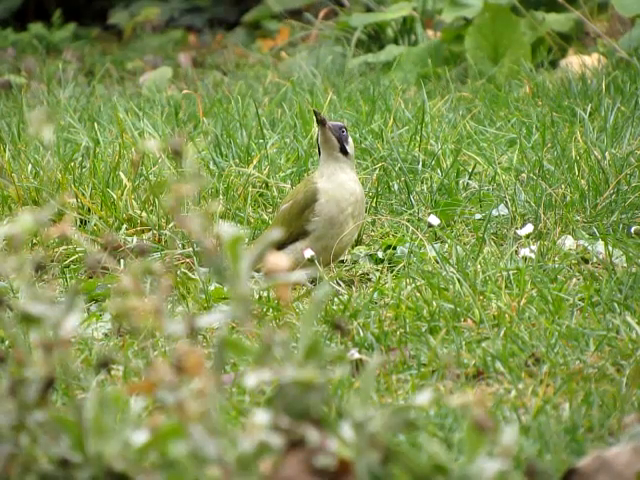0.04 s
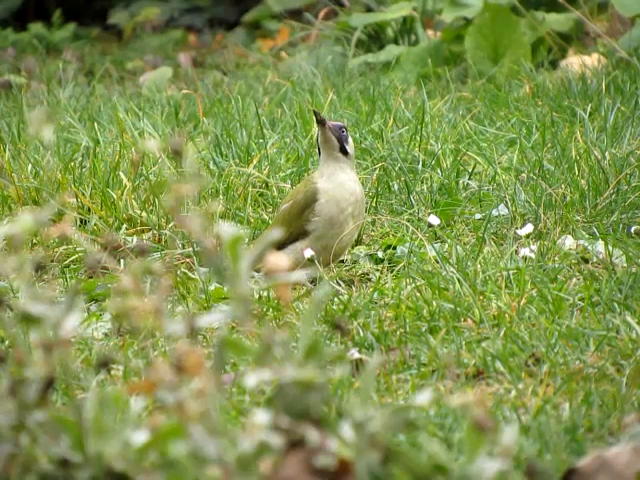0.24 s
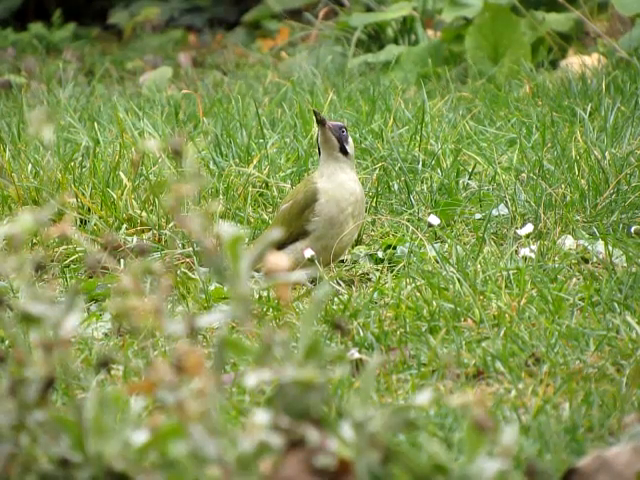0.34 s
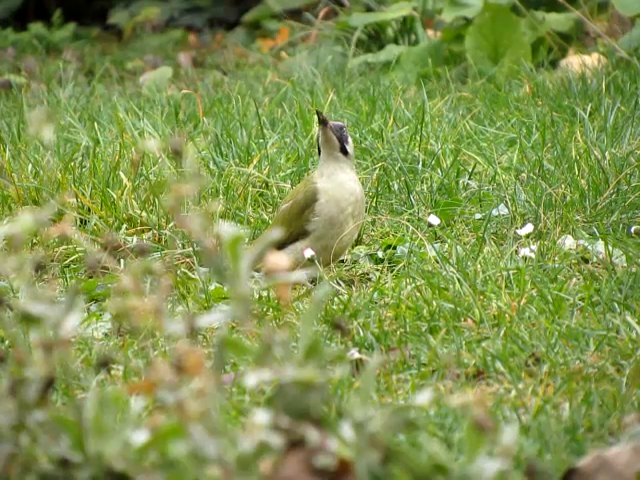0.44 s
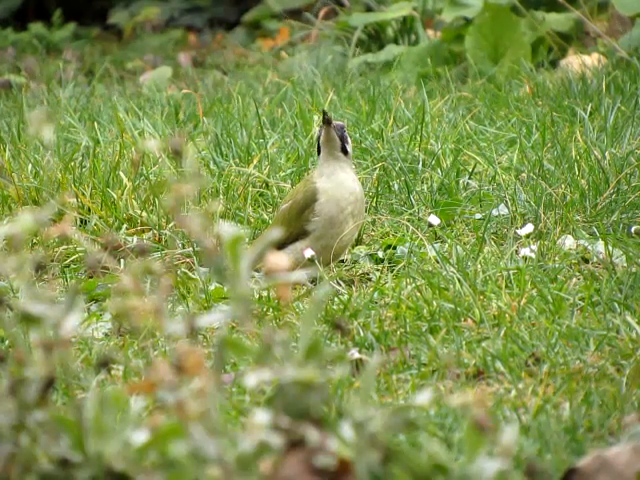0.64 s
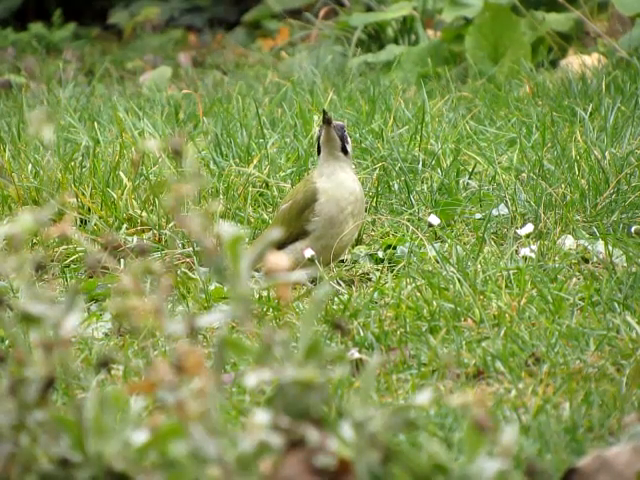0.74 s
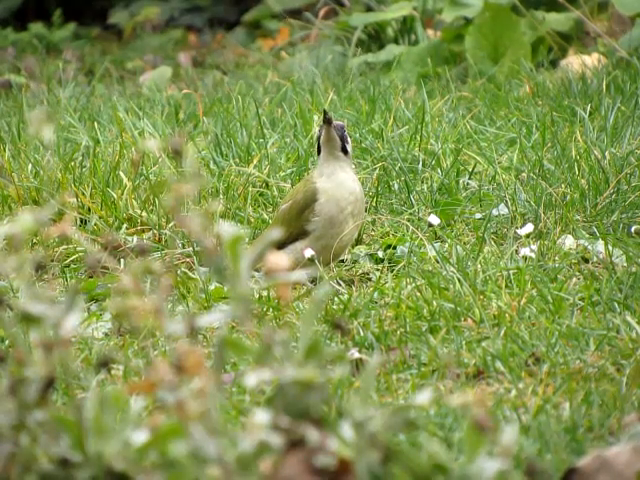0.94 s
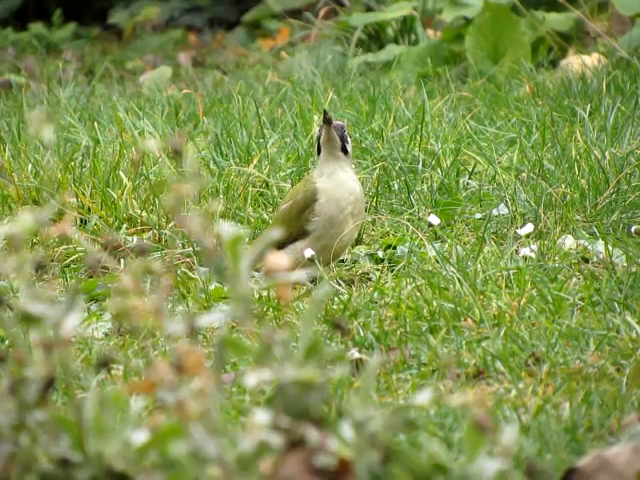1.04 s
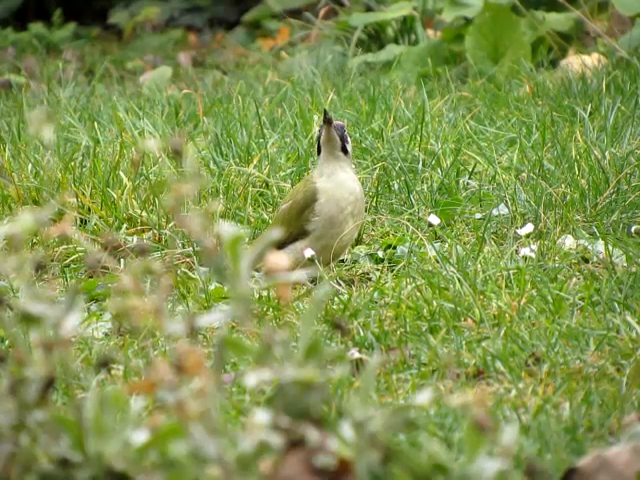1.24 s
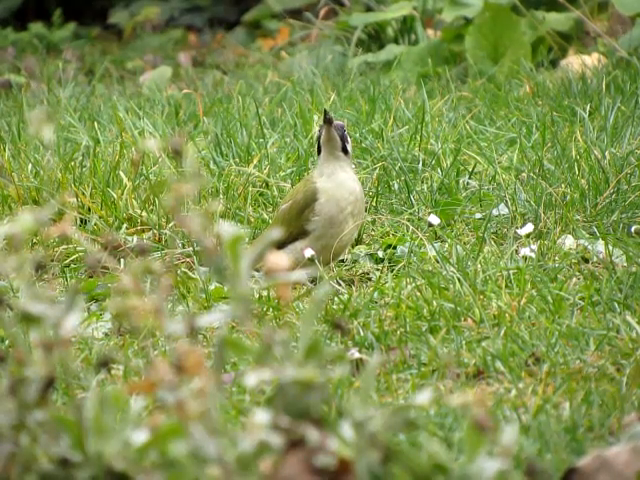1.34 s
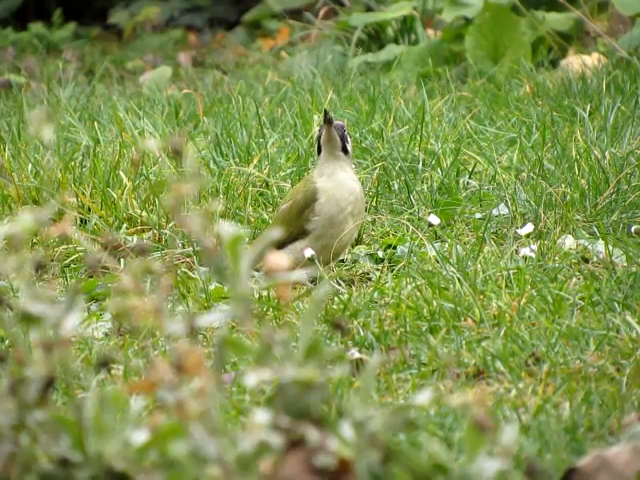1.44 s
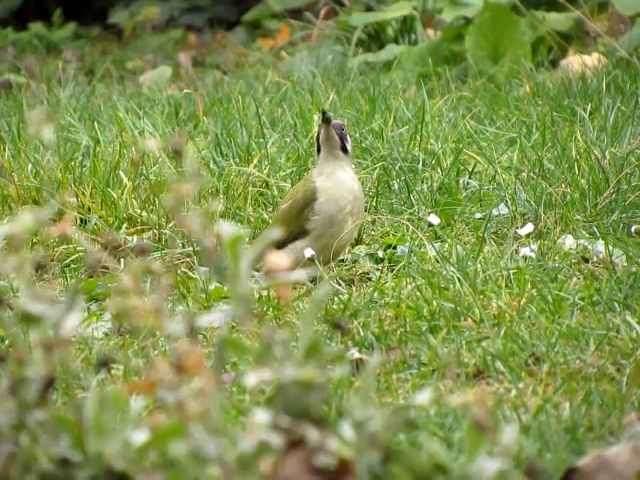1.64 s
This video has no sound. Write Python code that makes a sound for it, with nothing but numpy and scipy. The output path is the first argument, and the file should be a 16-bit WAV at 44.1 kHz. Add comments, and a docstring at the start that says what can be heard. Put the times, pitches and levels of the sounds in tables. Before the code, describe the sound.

A small bird gives one thin, high, slightly rising whistle from about 0.2 to 0.4 seconds, with a light flutter and a short tail across the lawn. Distant traffic murmurs throughout under a faint hiss, and a far low hum swells faintly between 0.6 and 1 second. From about 1.3 seconds, soft rustling comes near the microphone, with a dull bump and a brief hollow scuff around 1.4 seconds.

```python
"""A thin, rising whistle from a small bird across a lawn; hedges scatter it into a flutter and short tail.
Distant traffic (shaped noise) and an engine drone (wavering tones) murmur under a faint hiss, and a far
low hum swells a few times. Later, near the microphone, come a little rustling, a soft bump and a brief
scuff with a hollow ring, each made of enveloped, shaped noise."""
import sys
import numpy as np
from scipy import signal
from scipy.fft import rfft, irfft, next_fast_len
from scipy.io import wavfile
from scipy.ndimage import map_coordinates

SR = 44100
rng = np.random.default_rng(int(sys.argv[2]) if len(sys.argv) > 2 else 0)


def output_pcm(signal):
    """Save a mono or channel-first signal as 16-bit PCM at the path in sys.argv[1].

    Samples are clipped to [-1, 1] before scaling.
    """
    pcm = np.clip(np.atleast_2d(signal).T, -1, 1) * 32767
    wavfile.write(sys.argv[1], SR, np.round(pcm).astype(np.int16))


N = 74970
T = np.arange(N) / SR


def amp(db):
    """Decibels to gain."""
    return 10 ** (np.asarray(db) / 20)


def unit(x):
    """x at rms 1."""
    return x / np.sqrt(np.mean(x ** 2) + 1e-20)


def along(points, hz):
    """Interpolate (frequency [Hz], value) points on a log axis."""
    f, v = np.transpose(points)
    return np.interp(np.log(hz + 1), np.log(f + 1), v)


def gains(rows):
    """Gain per sample for each dB column after the time; silent before the first row."""
    times_s, *levels_db = np.transpose(rows)
    return [amp(np.interp(T, times_s, db, left=-120)) for db in levels_db]


def wobble(rate_hz):
    """Smooth random curve, rate_hz knots a second."""
    return map_coordinates(rng.standard_normal(int(N * rate_hz / SR) + 4), [T * rate_hz])


def filtered(x, response):
    """x through a frequency response."""
    size = next_fast_len(N + SR // 2)
    return irfft(rfft(x, size) * response(np.fft.rfftfreq(size, 1 / SR)), size)[..., :N]


def stereo_noise(spectrum):
    """Shaped noise of rms 1, left and right alike in the bass."""
    # left-right likeness: (frequency [Hz], correlation [-1..1])
    likeness = [(30, 0.73), (90, 0.77), (180, 0.57), (350, 0.066), (1400, 0.25), (3000, 0.063),
                (12000, 0.011)]

    def response(hz):
        angle = np.arccos(np.clip(along(likeness, hz), -1, 1)) / 2
        return amp(along(spectrum, hz)) * [np.cos(angle), np.sin(angle)]

    mid, side = filtered(rng.standard_normal((2, N)), response)
    return unit(np.array([mid + side, mid - side]))


def blows(rows):
    """Summed envelope of blows that rise quickly and die away."""
    envelope = np.zeros(N)
    for start_s, db, attack_s, t60_s in rows:
        age_s = np.maximum(T - start_s, 0)
        envelope += amp(db) * (1 - np.exp(-age_s / attack_s)) * np.exp(-np.log(1000) * age_s / t60_s)
    return envelope


def traffic():
    """Distant traffic: a low, nearly steady murmur."""
    # (frequency [Hz], relative density [dB])
    spectrum = [(15, -52), (27, 4.5), (45, -6), (100, -2), (130, 1), (200, -1), (290, 1.5), (390, -4.5),
                (720, -1.5), (1400, -7.5), (1620, -11.5), (2600, -24), (5000, -55), (14000, -78)]
    return amp(-44.5 + 0.15 * wobble(6.7)) * stereo_noise(spectrum)


def engine_drone():
    """A far engine: low tones wavering in level and phase."""
    # (frequency [Hz], level [dB])
    tones = [(62.5, -59), (163, -65), (247, -63.5), (286, -63)]
    drone = np.zeros(N)
    for hz, db in tones:
        level = np.sqrt(2) * amp(db + 1.6 * wobble(9.07))
        drone += level * np.sin(2 * np.pi * hz * T + 0.84 * wobble(6.27))
    return drone


def hiss():
    """Even hiss of air and microphone."""
    # (frequency [Hz], relative density [dB])
    spectrum = [(500, -20), (2000, 1.5), (3500, 2), (5000, -1.5), (7000, -2.5), (9000, -7), (11500, -8.5),
                (13200, -13), (13900, -48)]
    return amp(-53) * stereo_noise(spectrum)


def bird():
    """One tone climbing ever more slowly towards a ceiling, with a slight quaver and its echoes."""
    # whistle loudness: (time [s], level [dB])
    effort = [(.171, -65), (.18, -44.5), (.195, -45), (.203, -39), (.23, -40), (.237, -30), (.255, -27.5),
              (.272, -33), (.281, -54), (.287, -32), (.305, -29.5), (.314, -32), (.322, -28.5),
              (.352, -23.8), (.375, -31.5), (.389, -29.5), (.405, -40), (.412, -31), (.42, -43),
              (.436, -54)]
    start_s, start_hz, ceiling_hz, glide_s = .175, 6940, 7728, .122
    quaver_hz, flutter_db, octave_db, release_s = 16, 2.5, -43, .011
    lead_rad, pan_db = 1, 1.5  # left is earlier and louder
    echo_s, echo_db = .024, -24  # one reflection, beating against the rising tone
    pitch_hz = ceiling_hz - (ceiling_hz - start_hz) * np.exp(-np.maximum(T - start_s, 0) / glide_s)
    phase = 2 * np.pi * np.cumsum(pitch_hz + quaver_hz * wobble(260)) / SR
    envelope, = gains(effort + [(effort[-1][0] + release_s, -120)])
    level = np.sqrt(2) * envelope * amp(flutter_db * wobble(168.8))
    sides = np.array([[.5], [-.5]])
    stereo_phase = phase + lead_rad * sides
    tone = np.sin(stereo_phase) + amp(octave_db) * np.sin(2 * stereo_phase)
    direct = level * amp(pan_db * sides) * tone
    echo = filtered(direct, lambda hz: amp(echo_db) * np.exp(-2j * np.pi * hz * echo_s))
    call = level * np.sin(phase)
    near_plants = amp(-13) * scatter(call, t60_s=.1)
    far_hedges = amp(-9.5) * scatter(call, t60_s=.3)
    return direct + echo + near_plants + far_hedges


def scatter(x, t60_s):
    """Diffuse stereo echoes from foliage, as strong as x; moving leaves blur their phase."""
    tail = rng.standard_normal((2, SR // 2)) * np.exp(-np.log(1000) * T[:SR // 2] / t60_s)
    echoes = signal.hilbert(signal.fftconvolve(x[None], tail, axes=1)[:, :N])
    sway_rad = .45 * np.array([wobble(150), wobble(150)])
    return unit(np.real(echoes * np.exp(1j * sway_rad))) * np.std(x)


def hum():
    """A distant, unsteady low hum that swells briefly a few times."""
    # (time [s], level [dB])
    swells = [(0.646, -47), (0.751, -48.5), (.85, -52.5), (1.03, -53.5)]
    pitch_hz, sigma_s = 267.8, .012
    level = sum(amp(db) * np.exp(-.5 * ((T - peak_s) / sigma_s) ** 2) for peak_s, db in swells)
    return level * np.sqrt(2) * np.sin(2 * np.pi * pitch_hz * T + 1.14 * wobble(44.9))


def rustle():
    """Soft, close rustling: two noise bands that flicker independently."""
    # (time [s], middle level [dB], treble level [dB])
    levels = [(1.33, -55.5, -63), (1.46, -53.5, -59), (1.528, -46, -57), (1.58, -53, -58.5),
              (1.635, -46.5, -55.5), (1.7, -49, -47.5)]
    # both bands: (frequency [Hz], relative density [dB])
    middle_spectrum = [(200, -13), (450, -3.5), (690, -3), (1000, -5.5), (1500, -8.5), (3000, -28),
                       (8000, -49)]
    treble_spectrum = [(500, -37), (1500, -0.5), (5000, -3), (11000, -9.5), (13000, -11), (14000, -36)]
    middle_gain, treble_gain = gains(levels)
    middle = middle_gain * amp(1.6 * wobble(120)) * stereo_noise(middle_spectrum)
    treble = treble_gain * amp(1.3 * wobble(120)) * stereo_noise(treble_spectrum)
    return middle + treble


def bump():
    """A dull bump: two quick blows of dark noise."""
    # (time [s], level [dB], attack [s], t60 [s])
    hits = [(1.399, -31.5, .0007, .075), (1.409, -38.5, .001, .04)]
    # (frequency [Hz], relative density [dB])
    body = [(100, -23), (300, -7.5), (460, -3), (640, 4.5), (860, -4), (1200, -10.5), (1800, -20),
            (3000, -30), (7000, -50)]
    return blows(hits) * stereo_noise(body)


def scuff():
    """A crisp scuff: two close snaps of bright noise."""
    # (time [s], level [dB], attack [s], t60 [s])
    snaps = [(1.436, -36, .0005, .085), (1.448, -46, .001, .09)]
    # (frequency [Hz], relative density [dB])
    body = [(100, -9), (400, -4), (900, 4), (1450, 5), (2200, -6), (3200, -1.5), (5000, -1.5), (7500, -9.5),
            (11000, -6), (13000, -38), (14200, -35)]
    return blows(snaps) * stereo_noise(body)


def hollow_ring():
    """A short ring under the scuff: noise peaking sharply at 700 Hz."""
    # (time [s], level [dB], attack [s], t60 [s])
    hits = [(1.442, -36, 0.0047, 0.16)]
    # (frequency [Hz], relative density [dB])
    body = [(150, -34), (560, 0), (660, -2), (700, 9), (745, -1), (880, -15), (1100, -6), (1250, -21),
            (1450, -6.5), (1650, -11.5), (2200, -20), (3500, -17), (6000, -37), (9000, -41)]
    return blows(hits) * stereo_noise(body)


def scene():
    """The bird over the garden's background, then the close noises."""
    garden = bird() + traffic() + engine_drone() + hiss() + hum()
    return garden + rustle() + bump() + scuff() + hollow_ring()


def record(dry):
    """The camera's narrow notch and band limit."""
    notch_hz, width_hz, notch_db, top_hz = 3963, 210, -7.5, 15235

    def response(hz):
        notch = amp(notch_db * np.exp(-((hz - notch_hz) / width_hz) ** 2))
        return notch * (hz < top_hz)

    return filtered(dry, response)


dry = scene()
out = record(dry)
output_pcm(out)
```